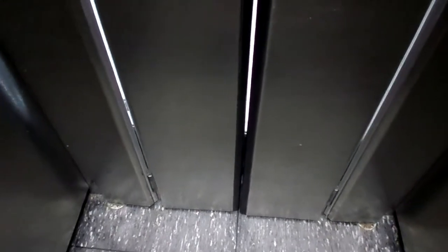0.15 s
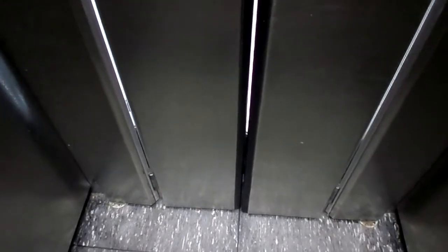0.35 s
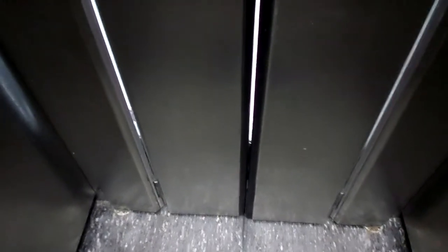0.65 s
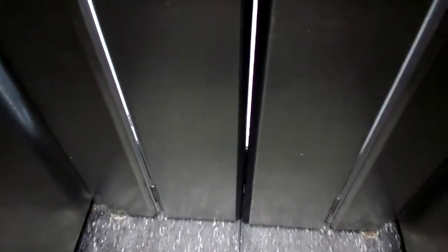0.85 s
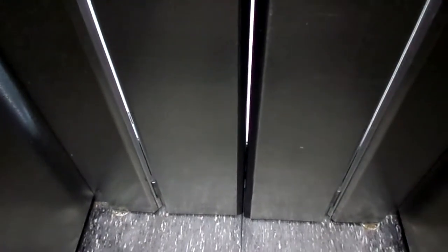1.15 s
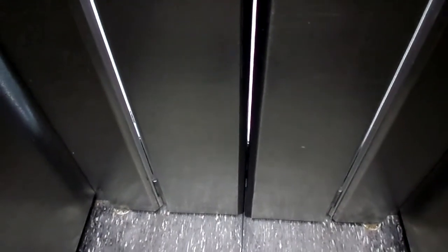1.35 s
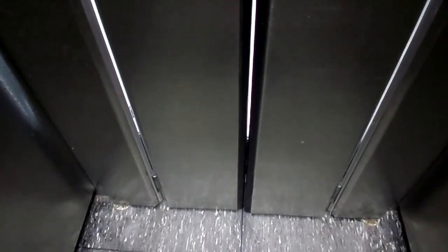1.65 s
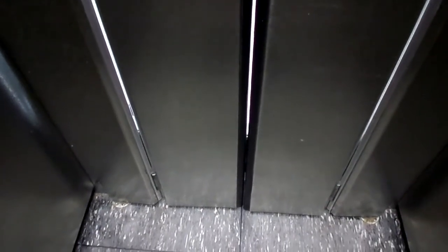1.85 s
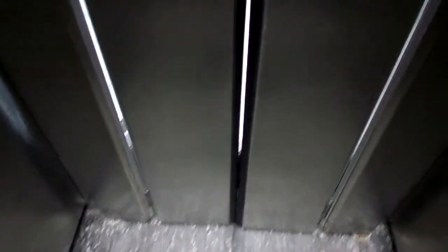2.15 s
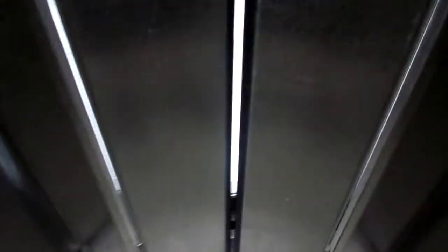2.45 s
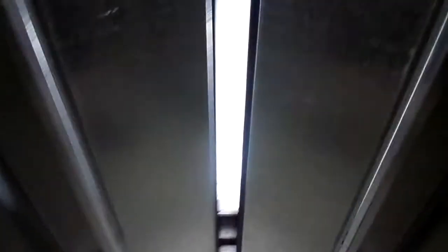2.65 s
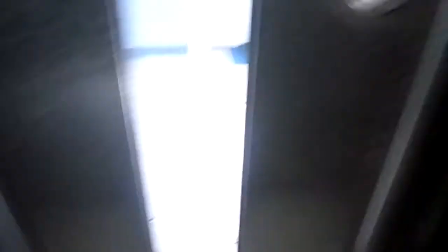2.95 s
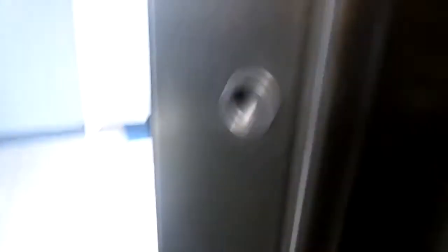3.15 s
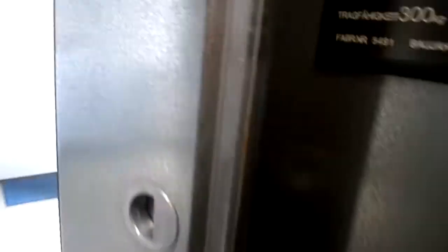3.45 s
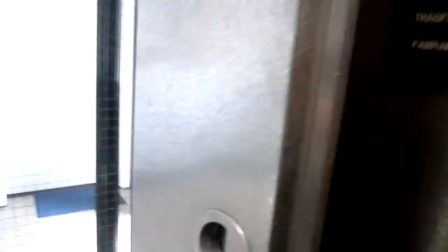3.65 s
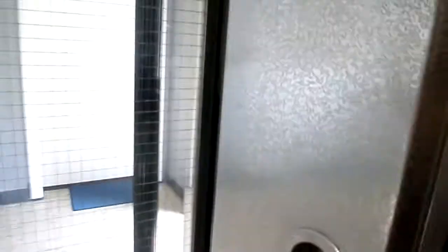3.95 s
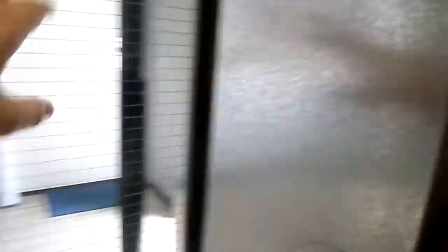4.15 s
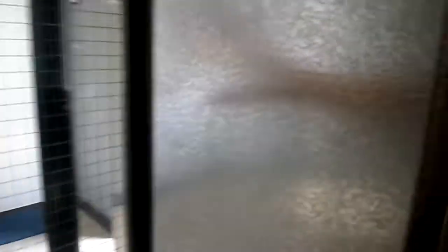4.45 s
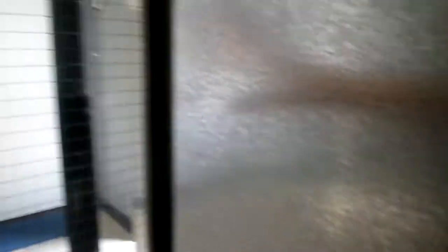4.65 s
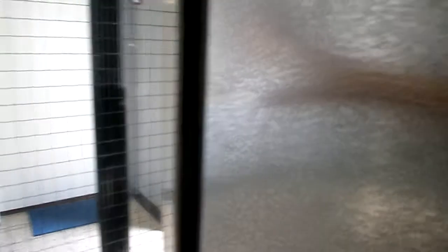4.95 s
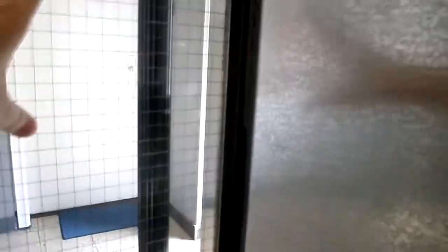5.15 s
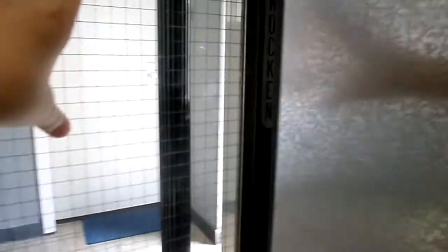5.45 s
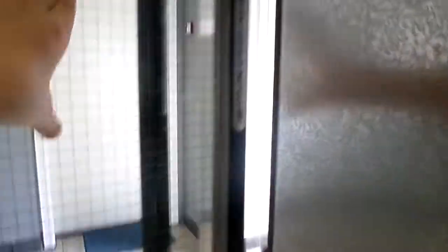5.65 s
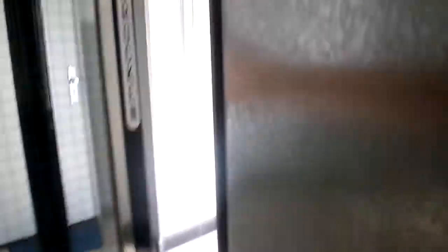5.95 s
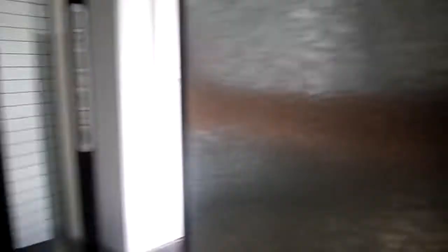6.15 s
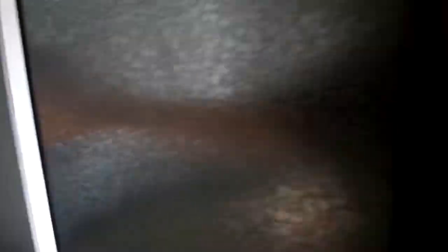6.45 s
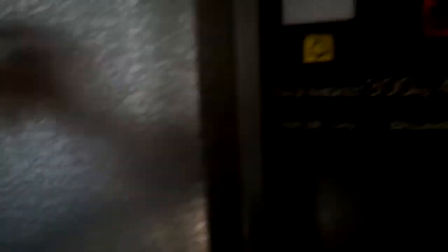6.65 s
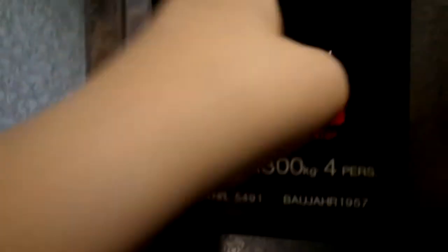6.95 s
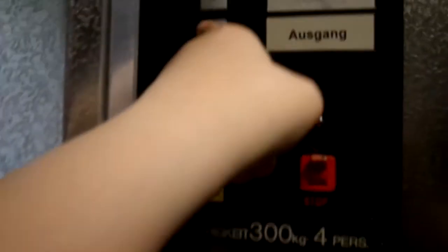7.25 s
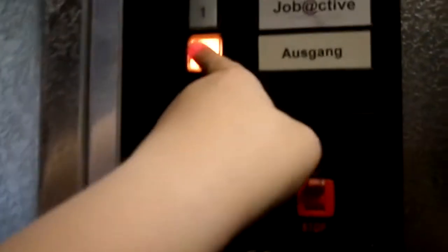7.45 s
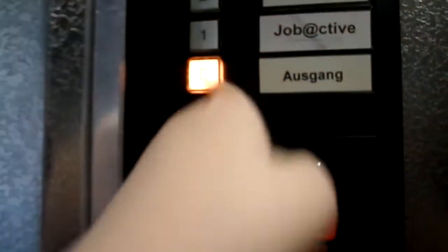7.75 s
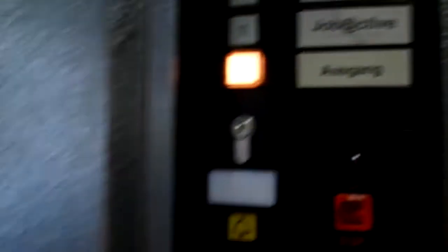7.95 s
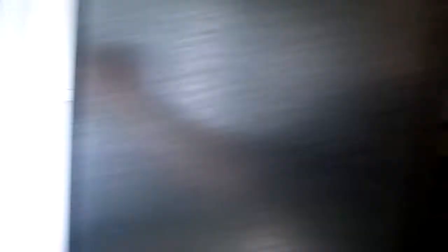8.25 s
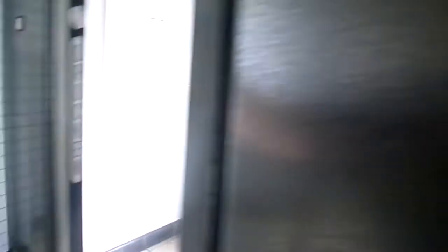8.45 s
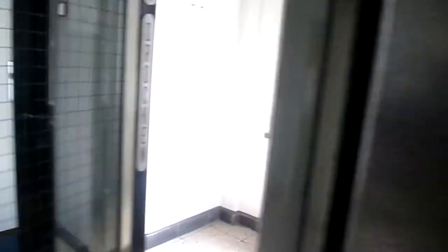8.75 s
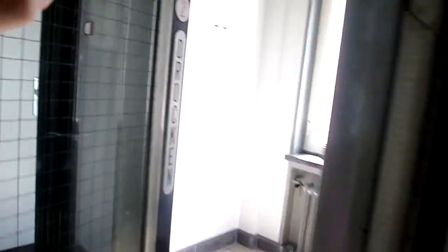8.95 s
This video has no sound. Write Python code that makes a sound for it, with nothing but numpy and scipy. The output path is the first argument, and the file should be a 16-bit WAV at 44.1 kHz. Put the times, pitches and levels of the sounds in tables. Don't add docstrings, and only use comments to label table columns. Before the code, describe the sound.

Close handheld sound inside a small thin-steel lift car, with short boxy echo, steady hiss, faint lamp hum and low handling rumble. Until about 1.6 s it is nearly still. Then a lock lets go with small ticks growing into a hard clank at 1.9 s, with cloth or seal rustle and a deep floor boom. A second clattering pull comes at 2.3 s, followed by rolling and lighter knocks until 3 s. The leaves fold with small clunks, a tiny hinge squeak at 3.5 s, a knock at 3.7 s and the big steel bang around 3.9 s. Thumps and a light touch come at 4.5 s. A sharp slap on glass at 5.06 s and a heavier, ringing, rattling one at 5.29 s follow. The glass door rolls and rubs until 6.5 s, latching softly near 6.2 s. Crisp button clicks sound at 7.1, 7.3 and 7.6 s, a dull bump at 8.4 s, a click at 8.7 s, then faint door judder from 8.9 s.

```python
import sys
import numpy as np
from scipy import signal
from scipy.fft import rfft, irfft, next_fast_len
from scipy.io import wavfile
from scipy.ndimage import uniform_filter1d

SR = 44100
rng = np.random.default_rng(int(sys.argv[2]) if len(sys.argv) > 2 else 0)


def voltage_ratio(decibels):
    exponent = np.asarray(decibels, float) / 20
    return 10 ** exponent


def dump_mix(stems):
    frames = np.atleast_2d(stems).T
    limited = np.clip(frames, -1, 1)
    pcm = np.round(limited * 32767).astype(np.int16)
    wavfile.write(sys.argv[1], SR, pcm)


N = 402005

# f/Hz, rms level/dB
HUM_LINES = [(199.2, -73.5), (382.2, -82), (602.9, -79), (699.8, -82.5), (802.1, -82.5), (899.0, -82)]
# f/Hz, density/dB per Hz
HISS_SPECTRUM = [(71, -46), (120, -19), (205, -6.5), (343, -8), (380, -19), (650, -17), (885, -8),
                 (1710, -18), (15200, -24.5), (16500, -31)]
# f/Hz, density/dB per Hz
RUMBLE_SPECTRUM = [(11, -35), (18, 1), (38, -8), (55, -8), (75, -17), (91, -18.5), (118, -24), (150, -22),
                   (200, -38), (330, -120)]
# t/s, level/dB
SWAY = [(0, -53), (.85, -50.5), (1.62, -54), (1.67, -44), (1.78, -42), (1.86, -33), (1.96, -42),
        (2.26, -42), (2.44, -31), (2.9, -40), (3.6, -37), (3.9, -43), (4.03, -30), (4.55, -42), (5.4, -44),
        (6.2, -46), (6.75, -51), (8.32, -52), (8.42, -45), (9.12, -52)]
# f/Hz, density/dB per Hz
RUSTLE_SPECTRUM = [(1470, -27), (2500, -13.5), (2970, -0.5), (5870, -1.5), (14900, -2.5), (16100, 1),
                   (16500, -40)]
# t/s, time to rise 20 dB/s, time to fall 20 dB/s, peak level/dB
RUBS = [(1.81, .07, .2, -53.5), (1.94, .08, .075, -34), (2.27, .2, .4, -59), (2.31, .03, .1, -54),
        (3.82, .06, .1, -56), (2.62, .04, .08, -55), (2.73, .04, .08, -59), (3.63, .03, .1, -54),
        (3.07, .2, .1, -56), (3.33, .12, .2, -54), (3.44, .1, .1, -54), (3.58, .5, .6, -60),
        (3.93, .08, .09, -42), (4.29, .03, .2, -54), (4.36, .11, .2, -49), (4.42, .1, .05, -50),
        (7.22, .08, .1, -56), (8.73, .1, .2, -58), (4.65, .3, .9, -62), (5.27, .7, .03, -58),
        (5.47, .15, .8, -59), (6.06, .3, .2, -48), (6.25, .2, .6, -61), (6.8, .8, 1.1, -62),
        (7.25, .5, .3, -57.5), (8.35, .9, 1.6, -62), (8.68, .2, .3, -61)]
# t/s, effort/dB
SLIDING = [
    (1.62, -70),
    (1.636, -49),
    (1.73, -46),
    (1.85, -34),
    (1.94, -44),
    (2.09, -45.5),
    (2.26, -41),
    (2.6, -41),
    (3.0, -51),
]
# t/s, effort/dB
STACKING = [
    (3.14, -46),
    (3.4, -49),
    (3.7, -40),
    (3.97, -32),
    (4.07, -41),
    (4.19, -49),
    (4.33, -61),
    (4.46, -50.5),
    (4.65, -62),
]
# t/s, effort/dB
SWINGING = [
    (4.95, -66),
    (5.09, -53),
    (5.3, -56),
    (5.47, -47),
    (5.84, -42),
    (6.11, -39.5),
    (6.165, -46),
    (6.4, -51),
    (6.7, -70),
]
# t/s, effort/dB
CLOSING = [
    (8.55, -68),
    (8.71, -53),
    (8.885, -58),
    (8.897, -50),
    (9.12, -51),
]
# t/s, scrape re rolling/dB
BINDING = [(1.65, -38), (1.74, -28), (1.78, -15), (1.85, -12), (2.05, 1), (2.17, -3.5), (2.55, -22),
           (3.3, -13), (4.2, -21), (5.6, -13), (8.85, -13), (8.9, -7), (9.12, -8)]
# f/Hz, width/Hz, level/dB
STEEL = [(128, 15.4, -4), (179, 14, 5), (215.2, 21.6, 1), (282.6, 30, -1), (378, 47, -8.5), (419, 16, 3.5),
         (476, 23, -2), (538.6, 20.4, 2), (562, 20, -3), (618.6, 28, 0), (702, 48, -7), (788, 40, 1),
         (810, 38, -9.5), (905, 42, 0), (1003, 8.9, -11), (1055, 23, -0.5), (1188, 31, -5), (1457, 38, 1.5),
         (1420, 16, -3), (1557, 14, 1.5), (1686, 38, 1), (1950, 24, -6), (2107, 13, -4.5), (2140, 24, -1)]
# f/Hz, width/Hz, level/dB
GLASS = [(144.3, 15.8, -1.5), (228.5, 26, -3), (290, 26, -5), (320, 16, -2), (355, 11.4, -4.5),
         (416, 13.6, -6), (400, 20, -8), (490, 20, -6), (560, 25, -14), (645, 25, -8), (813, 28, -9),
         (900, 8.3, -12), (1150, 110, -16.5), (1224, 10, -4), (1518, 15, -7), (1834, 40, -16),
         (1990, 90, -21.5), (2166, 48, -13), (2300, 60, -25)]
# t/s, length/s, level/dB, start f/Hz, end f/Hz, roughness 0-1
SQUEAK = (3.522, .062, -40, 1020, 1170, .9)
# t/s, peak level/dB
TICKS = [
    (2.381, -25),
    (2.806, -36),
    (4.874, -37.5),
    (5.002, -42),
]
# t/s, peak level/dB, f/Hz (negative: first drops), t60/s
THUMPS = [(1.888, -25, 32.6, 0.23), (1.95, -22, 32.3, 0.22), (2.321, -17.5, 37.7, 0.17),
          (2.369, -18, 33, 0.14), (3.311, -25.5, 89.4, 0.24), (3.39, -20, -84.4, 0.2),
          (3.45, -24, 87, 0.18), (3.901, -21.5, 32, 0.27), (3.94, -20.5, 79, 0.29), (4.315, -30, 28, .9),
          (4.435, -28, -170, 0.12), (4.448, -22, -95, .08), (4.465, -19, 95, 0.1), (4.485, -28, -130, .12),
          (5.262, -20, 39.7, 0.1), (8.368, -32, -62, 0.2), (8.4, -38, 95, .3), (6.25, -44, 98, .8),
          (8.9, -43, 92, .8), (8.415, -20, 43.6, 0.074), (8.445, -30, 42, 0.2), (8.474, -36, 27, .8),
          (8.595, -34, 24.5, .6), (7.27, -38, 60, .4), (8.803, -38, -70, .03), (8.862, -37, -60, .03),
          (8.882, -38, -70, .03)]
# t/s, peak level/dB, f/Hz (negative:
# first drops), t60/s
RINGS = [(3.512, -48.5, 3250, 0.068), (4.458, -31, -200, 0.12), (4.437, -42, 520, .08),
         (4.783, -46, 2180, 0.061), (5.29, -12.5, 362, 0.25), (5.36, -31, 325, .3),
         (5.29, -11, 211, 0.13), (6.18, -28, 633, 0.033), (6.18, -38, 1190, 0.15),
         (6.18, -41, 1030, .1), (7.11, -29, 1920, 0.022), (7.11, -31, 2400, .02),
         (7.632, -36, 2300, 0.044), (8.665, -37.5, 1230, 0.099), (8.9, -36, 358, .1),
         (6.075, -44, 823, 0.076), (1.888, -12.5, 1500, 0.015), (3.708, -22, 900, 0.04),
         (3.708, -22, 600, .07), (3.857, -33, 805, .05), (3.895, -15, 780, .07),
         (3.936, -10, 480, 0.04), (3.945, -15, 640, .04), (3.943, -22, 1750, .05),
         (4.516, -32, 3000, 0.015), (5.289, -21, 1550, .12), (5.287, -23, 950, .1),
               (5.288, -19, 1850, .07), (5.3, -24, 650, .06), (5.33, -36, 950, .2), (1.787, -25, 650, .04),
               (1.78, -30, 980, .06), (1.828, -23, 650, .04), (1.877, -12, 720, .03),
               (1.884, -13, 850, .04), (1.873, -16, 1750, .04), (2.288, -26, 1400, .06),
               (2.281, -29, 550, .08), (2.283, -38, 3600, .08), (2.3, -39, 4400, .08),
               (2.452, -33, 560, .08), (2.462, -32, 700, .05), (2.695, -39, 520, .12),
               (2.57, -38, 620, .05), (3.2, -41, 900, .05), (3.708, -26, 2000, .04), (1.638, -48, 560, .12),
               (1.655, -42, 330, .15), (6.23, -46, 1170, .25), (3.52, -34, 550, .12),
               (3.512, -45, 2000, .05), (5.553, -42, 460, .12), (5.553, -45, 650, .15),
               (6.18, -40, 850, .1), (6.18, -40, 450, .08), (6.25, -47, 355, .5), (8.899, -44, 2050, .07),
               (8.897, -46, 2330, .05), (8.903, -46, 1300, .05), (8.915, -46, 1950, .07),
               (9.09, -48, 1180, .15), (9.045, -50, 2050, .06), (8.665, -43, 2900, .05),
               (9.04, -52, 1150, .1), (3.115, -41, 680, .06), (3.22, -38, 700, .06),
               (3.382, -41, 1550, .05), (3.425, -42, 1500, .1), (7.11, -29, 2920, 0.0079),
               (7.632, -38, 1250, .08), (6.687, -47, 1680, .08)]
# t/s, peak level/dB, f/Hz, t60/s
SWELLS = [
    (3.872, -11, 520, .09),
    (.58, -57, 395, .5),
    (1.857, -24, 600, .1),
]
# t/s, peak level/dB, lowest f/Hz, highest f/Hz
EDGES = [(2.2808, -33, 2500, 9000), (2.5991, -38, 3000, 11000), (2.7175, -46, 3000, 10000),
         (3.2017, -38, 4000, 10000), (3.512, -42, 2000, 4000), (3.522, -45, 7500, 9500),
         (3.6168, -35, 3500, 12000), (3.696, -44, 6000, 8000), (3.81, -44, 2000, 5000),
         (3.8795, -21, 600, 2200), (3.9355, -12, 600, 3000), (3.7092, -24, 1200, 5000),
         (4.5163, -26, 2000, 6500), (4.794, -44, 3800, 6500), (5.0643, -7, 1800, 14000),
         (5.2883, -7, 3000, 15000), (6.6864, -40, 1200, 4500), (7.1101, -25, 1300, 3500),
         (7.1102, -33, 8000, 15000), (7.2718, -29, 5000, 15000), (7.2833, -29, 6000, 15000),
         (7.5984, -36, 4000, 15000), (7.6318, -28, 1500, 6000), (7.6397, -27, 7000, 15000)]
# f/Hz, density/dB per Hz
STEEL_TREBLE = [(820, -12), (1400, 7.5), (5820, -7), (8700, -6), (10400, -14), (12600, -9.5), (16000, -22),
                (16500, -64)]
# f/Hz, density/dB per Hz
NEAR_TREBLE = [(820, -35), (1400, -12), (1550, -2), (2550, -2.5), (3620, -5.5), (5090, -1.5), (13400, -2),
               (15700, -1), (16500, -28)]
# t/s, rattle peak/dB, clang re rattle/dB, crack re rattle/dB, t60/s
CLICKS = [(6.0704, -43.5, 8, -9, .088), (6.178, -46, 15, -9, .3), (6.6859, -40, 2, -14, .21),
          (7.1092, -28, -6, -4, .17), (7.269, -33.5, -8, 2, .09), (7.2825, -38, 8, 6.5, .2),
          (7.5523, -50, 9.5, -11, .18), (7.597, -39.5, -3, 2.5, .17), (7.6312, -25, -10, -8, .086),
          (7.6375, -29.5, 1.5, 2, .3), (8.6533, -36.5, 3, -17, .13), (8.6678, -29, -8.5, -7.5, .095),
          (8.899, -43, -5, -24, .16)]
# t/s, rattle peak/dB, thud re rattle/dB, crack re rattle/dB, t60/s
SLAPS = [
    (4.5165, -28.5, -9.5, -11, .097),
    (4.7825, -42.5, -16, -3, .3),
    (5.0605, -38, -19, 10, .05),
    (5.064, -14, -19, 0, .21),
    (5.2845, -24, 18, 6, .16),
    (5.288, -10, -1.5, 3, .2),
    (5.2976, -6.5, -8, 2.5, .06),
    (5.307, -23, -5, -11, .18),
    (5.4188, -34.5, 6, -2.5, .17),
    (5.6371, -44.5, 22, -24.5, .21),
]
# t/s, clang peak/dB, thud re clang/dB, hardness/dB, t60/s
UNLOCKING = [(1.636, -60, 21, -40, .3), (1.675, -47, 8, -33, .4), (1.705, -46, 1, -26, .4),
             (1.748, -39, -9, -16, .23), (1.777, -31, -12, -18, .15), (1.787, -24, -17, -30, .12),
             (1.819, -30, -6, -5, .17), (1.828, -25, -13, -18, .13), (1.85, -28, -5, -10, .2),
             (1.865, -22, -10, -20, .1), (1.873, -8, -7, -11, .076), (1.887, -20.5, -1, 0, .15),
             (1.921, -21, -5, -3, .27), (1.947, -24, -8, 3, .13), (2.009, -37, -16, -7, .45),
             (2.28, -23, 2, -6, .2), (2.288, -21, -3, -14, .15), (2.301, -23, 0, -14, .15),
             (2.312, -21.5, 0, -6, .21), (2.35, -29, 3, -18, .27), (2.399, -32, -5, -22, .096),
             (2.447, -31, -5, -14, .17), (2.461, -30, -8, -24, .12), (2.569, -36, -18, -36, .25),
             (2.597, -36.5, -21, -14, .17), (2.691, -39, -4, -24, .25), (2.839, -42, -11, -16, .18)]
# t/s, clang peak/dB, thud re clang/dB, hardness/dB, t60/s
FOLDING = [(3.097, -37.5, 3.5, -8, .15), (3.201, -36, -3, -13, .11), (3.38, -33.5, 13.5, -21, .12),
           (3.428, -43.5, 13, -2, .23), (3.512, -37, 1.5, -15, .15), (3.603, -41, 0, -12, .2),
           (3.622, -38, 0, -4, .3), (3.7075, -21, -12, -18, .22), (3.857, -30, -16, -23, .15),
           (3.871, -27, -5, -21, .17), (3.879, -19, 0, -8, .17), (3.891, -15, -11, -3.5, .15),
           (3.931, -26, -15, -3, .06), (3.936, -13, -21, -22, .07), (3.942, -17, -15, -4, .09),
           (3.948, -28, -15, -1.5, .092), (4.016, -27, -2, -15, .26), (4.079, -36, 0, -19, .2)]
# start t/s, end t/s
DROPOUTS = [
    (5.045, 5.059),
    (5.277, 5.283),
]


def rms_one(x):
    return x / np.sqrt(np.mean(x ** 2) + 1e-20)


def band(x, low_hz, high_hz):
    return signal.sosfilt(signal.butter(2, [low_hz, high_hz], "band", fs=SR, output="sos"), x)


def coloured(x, spectrum):
    hz, level_db = np.transpose(spectrum)
    size = next_fast_len(N)
    grid = np.maximum(np.arange(size // 2 + 1) * SR / size, 1)
    gain = voltage_ratio(np.interp(np.log(grid), np.log(hz), level_db, left=-90, right=-90))
    return rms_one(irfft(rfft(x, size) * gain, size)[:N])


def drift(rate_hz):
    knots = int(N / SR * rate_hz) + 3
    return np.interp(np.arange(N) * rate_hz / SR, np.arange(knots), rng.standard_normal(knots))


def follow(t, curve):
    return voltage_ratio(np.interp(t, *np.transpose(curve)))


def grains(per_s, spread_db):
    chance, size = rng.random((2, N))
    at = np.flatnonzero(chance < per_s / SR)
    strength = voltage_ratio(spread_db * np.minimum(-np.log(1 - size[at]), 4))
    out = np.zeros(N)
    out[at] = strength * np.sign(chance[at] - per_s / SR / 2)
    return rms_one(out)


def body(x, peaks, between_db, low_hz, high_hz):
    inside = [p for p in peaks if low_hz < p[0] < high_hz]
    out = voltage_ratio(between_db + np.mean(inside, axis=0)[2]) * x
    for k, (hz, width_hz, level_db) in enumerate(inside):
        r = np.exp(-np.pi * width_hz / SR)
        top = [(1 - r * r) / 2, 0, (r * r - 1) / 2]
        bottom = [1, -2 * r * np.cos(2 * np.pi * hz / SR), r * r]
        out += (-1) ** k * voltage_ratio(level_db) * signal.lfilter(top, bottom, x)
    return band(out, low_hz, high_hz)


def struck(drive, peaks, between_db, low_hz, high_hz, first=0):
    contacts = grains(6000, spread_db=2.5)
    scale = np.std(body(contacts[:SR // 2], peaks, between_db, low_hz, high_hz))
    live = np.flatnonzero(drive > 1e-7)
    span = slice(live[0], live[-1] + SR // 2)
    out = np.zeros(N)
    out[span] = body((contacts * drive + first)[span], peaks, between_db, low_hz, high_hz) / scale
    return out


def hum():
    t = np.arange(N) / SR
    return sum(np.sqrt(2) * voltage_ratio(level_db + 4.6 * drift(15)) * np.sin(2 * np.pi * hz * t)
               for hz, level_db in HUM_LINES)


def microphone_hiss(dry):
    loudness = signal.lfilter([.0002], [1, -.9998], np.abs(dry))
    return voltage_ratio(-63 - 4.0) * coloured(rng.standard_normal(N), HISS_SPECTRUM) / (1 + 15.5 * loudness)


def handling_rumble():
    t = np.arange(N) / SR
    return follow(t, SWAY) * voltage_ratio(2.6 * drift(9)) * coloured(rng.standard_normal(N), RUMBLE_SPECTRUM)


def rubbing(lasts):
    t = np.arange(N) / SR
    coarse = t[::100]
    power = np.zeros(len(coarse))
    for s, rise_s, fall_s, level_db in RUBS:
        away = np.maximum((s - coarse) / rise_s, (coarse - s) / (fall_s * lasts))
        power += voltage_ratio(level_db - 20 * away ** 1.4) ** 2
    return np.interp(t, coarse, np.sqrt(power))


def cloth_rustle(hits):
    idle = voltage_ratio(-67.5) / (1 + 30 * signal.lfilter([.0002], [1, -.9998], np.abs(hits)))
    rustle = coloured(grains(15000, spread_db=1.0), RUSTLE_SPECTRUM)
    return np.hypot(idle, rubbing(lasts=1)) * voltage_ratio(1.6 * drift(16)) * rustle


def door_travel():
    t = np.arange(N) / SR
    glass_takes_over_s = 4.9
    glass = np.clip((t - glass_takes_over_s) / .2, 1e-6, 1 - 1e-6)
    steel = 1 - glass
    idle_roll = voltage_ratio(np.interp(glass, [0, 1], (-65, -59.5)))
    idle_scrape = voltage_ratio(np.interp(glass, [0, 1], (-71, -67)))
    travel = follow(t, SLIDING + STACKING + SWINGING + CLOSING)
    roll = np.hypot(travel, idle_roll) * voltage_ratio(1.5 * drift(25))
    grate = np.hypot(travel * follow(t, BINDING), voltage_ratio(-5.5) * rubbing(lasts=1.8))
    scrape = np.hypot(grate, idle_scrape) * voltage_ratio(2.2 * drift(40))
    out = struck(steel * roll, STEEL, -10.0, 96, 700)
    out += struck(steel * scrape, STEEL, -1.0, 700, 2800)
    out += struck(glass * roll, GLASS, -13.0, 75, 620)
    out += struck(glass * scrape, GLASS, 4.5, 820, 2440)
    return out


def closer_judder():
    start = round(8.897 * SR)
    slips = band(grains(160, spread_db=2.5)[start:], 150, 440)
    shaken = body(slips, GLASS, 1.5, 150, 500)
    return voltage_ratio(-42) * np.concatenate([np.zeros(start), rms_one(shaken)])


def hinge_squeak():
    s, length_s, level_db, from_hz, to_hz, rough = SQUEAK
    u = np.arange(round(length_s * SR)) / (length_s * SR)
    phase = 2 * np.pi * np.cumsum(from_hz + (to_hz - from_hz) * np.sqrt(u)) / SR
    swell = voltage_ratio(level_db) * np.sin(np.pi * u) ** .5 * (1 + rough * np.sin(phase / 17))
    out = np.zeros(N)
    out[round(s * SR):][:len(u)] = swell * np.sin(phase + rough * np.sin(phase / 7))
    return out


def case_ticks():
    clicks = np.full(N, 1e-18)
    for s, level_db in TICKS:
        clicks[round(s * SR)] = -voltage_ratio(level_db + 6.5)
    return signal.lfilter([1], [1, -.9], clicks)


def ringing_modes(table, rise_cycles, twin=0.):
    twin_ratio = 1.06
    out, t = np.zeros(N), np.arange(SR // 2) / SR
    for s, level_db, hz, t60_s in table:
        at = round(s * SR)
        envelope = (1 - np.exp(-t * abs(hz) / rise_cycles)) * voltage_ratio(level_db - 60 * t / max(t60_s, .008))
        tone = np.sin(2 * np.pi * hz * t) + twin * np.sin(2 * np.pi * hz * twin_ratio * t)
        out[at:][:len(t)] += (envelope * tone / (1 + twin))[:N - at]
    return out


def first_edges():
    out = np.zeros(N)
    for s, level_db, low_hz, high_hz in EDGES:
        edge = band(np.arange(SR // 100) == 0, low_hz, high_hz)
        out[round(s * SR):][:len(edge)] += voltage_ratio(level_db) * edge / np.abs(edge).max()
    return out


def fades(table, column, rise_s, lasting, snap=0.):
    out, first, t = np.zeros(N), np.zeros(N), np.arange(SR // 2) / SR
    for row in table:
        at = round(row[0] * SR)
        level_db = row[1] + (row[column] if column > 1 else 0)
        first[at] = voltage_ratio(level_db)
        envelope = (1 - np.exp(-t / rise_s)) * voltage_ratio(level_db - 60 * t / (lasting * max(row[5], .02)))
        envelope = envelope * (1 + snap * np.exp(-t / 0.0015))
        out[at:at + len(t)] += envelope[:N - at] ** 2
    return np.sqrt(out) + 1e-9, first


def chattering_blows(table, peaks, clang, rattle, treble, gain_db, touch):
    drive, first = fades(table, column=2, rise_s=0.0051, lasting=0.9)
    thud = struck(drive, peaks, -10.5, 83, 413, 7.9 * touch * first)

    drive, first = fades(table, column=clang, rise_s=0.0017, lasting=1.0, snap=1.1 * touch)
    ring = struck(drive, peaks, -4.5, 347, 1430, 9.2 * touch * first)

    drive, first = fades(table, column=rattle, rise_s=0.0024, lasting=0.78, snap=0.74 * touch)
    bright = coloured(grains(12000, spread_db=4.5), treble)
    edge = drive * rms_one(band(bright, 970, 4450))
    edge += 0.16 * struck(drive, peaks, 0.5, 1400, 2420)
    edge += 10.7 * touch * band(first, 1400, 5300)

    drive, first = fades(table, column=4, rise_s=0.00095, lasting=0.82, snap=0.27 * touch)
    crack = drive * rms_one(band(bright, 6200, 15000))
    crack += 4.0 * touch * band(first, 5000, 15000)
    return voltage_ratio(gain_db) * (thud + ring + edge + crack)


def slaps_and_clicks():
    slaps = [(s, db, thud, .45 * thud - 12, crack, t60) for s, db, thud, crack, t60 in SLAPS]
    clicks = [(s, db, clang - 15, clang, crack, t60) for s, db, clang, crack, t60 in CLICKS]
    return chattering_blows(slaps + clicks, GLASS, clang=3, rattle=1, treble=NEAR_TREBLE,
                            gain_db=-8.5, touch=0.78)


def steel_doors():
    table = [(s, db, thud, hard, .75 * hard - 9, t60) for s, db, thud, hard, t60 in UNLOCKING + FOLDING]
    return chattering_blows(table, STEEL, clang=1, rattle=3, treble=STEEL_TREBLE, gain_db=-4.0, touch=0.55)


def car_echo(x):
    t60_s = 0.28
    size = next_fast_len(N + SR)
    w = 2 * np.pi * np.arange(size // 2 + 1) / size
    response = 0
    for k, lag in enumerate((np.geomspace(.007, .029, 10) * SR).astype(int)):
        loop = voltage_ratio(-60 * lag / SR / t60_s) * np.exp(-1j * w * lag)
        response = response + (-1) ** k * loop / (1 - loop)
    return irfft(rfft(x, size) * response, size)[:N] / np.sqrt(10)


def scene():
    hits = steel_doors() + slaps_and_clicks()
    hits += ringing_modes(RINGS, rise_cycles=0.39, twin=.3)
    hits += ringing_modes(SWELLS, rise_cycles=5.0)
    hits += closer_judder() + first_edges()
    background = hum() + handling_rumble() + cloth_rustle(hits) + door_travel()
    small = hinge_squeak() + case_ticks()
    booms = ringing_modes(THUMPS, rise_cycles=0.1)
    mix = hits + voltage_ratio(-13.5) * car_echo(hits) + booms + small + background
    return mix[None]


def low_pass(x):
    return signal.sosfilt(signal.butter(12, 16820, fs=SR, output="sos"), x)


def record(dry):
    x = dry + microphone_hiss(dry)
    t = np.arange(N) / SR
    inside = sum((t > a) & (t < b) for a, b in DROPOUTS) * 1.
    muted = uniform_filter1d(inside, size=60)
    ahead = x * (1 - np.roll(muted, 200) + muted).clip(0, 1)
    dull = signal.sosfiltfilt(signal.butter(4, 1100, fs=SR, output="sos"), ahead)
    x = x + muted * (dull - x)
    mix = signal.sosfilt(signal.ellip(16, .3, 80, 16050, fs=SR, output="sos"), x)
    return low_pass(mix)


dry = scene()
out = record(dry)
dump_mix(out)
```